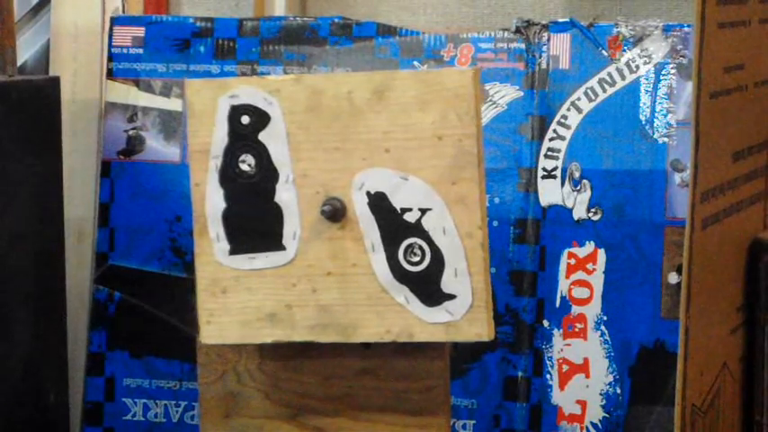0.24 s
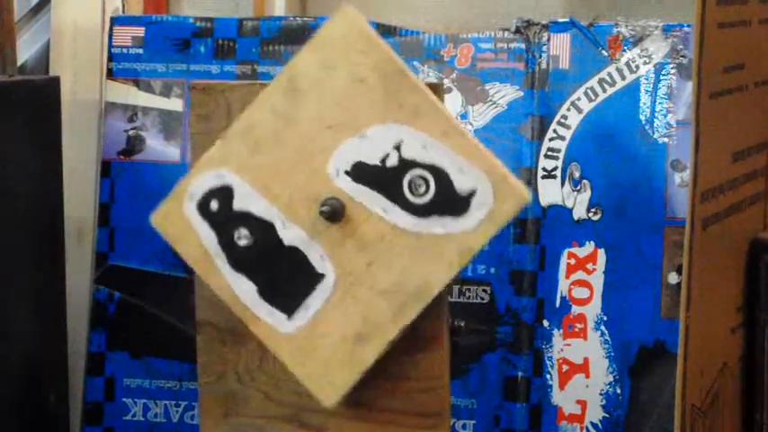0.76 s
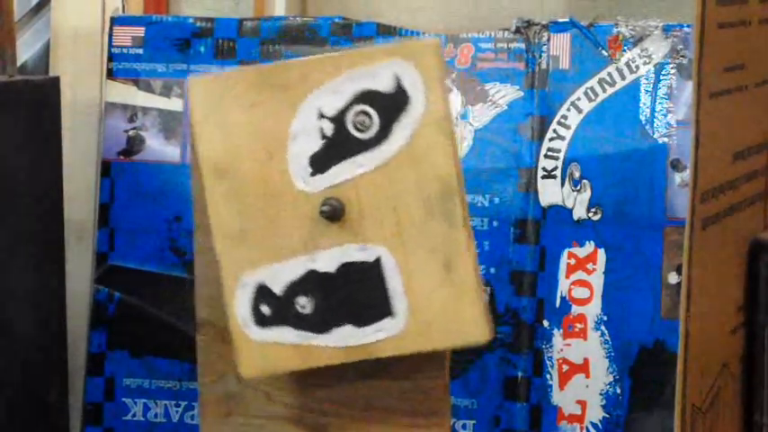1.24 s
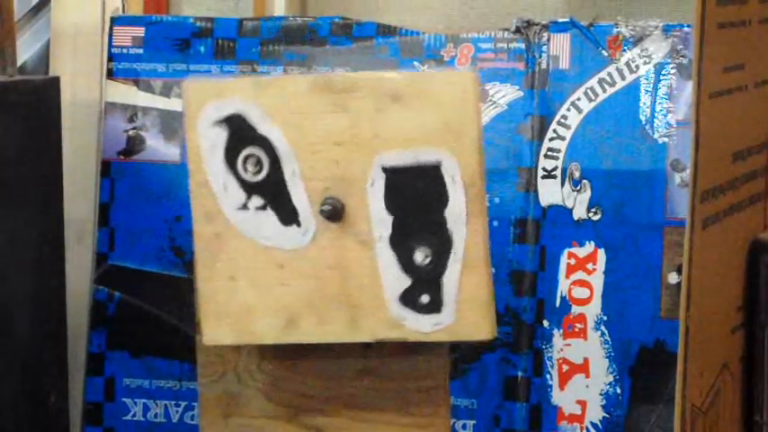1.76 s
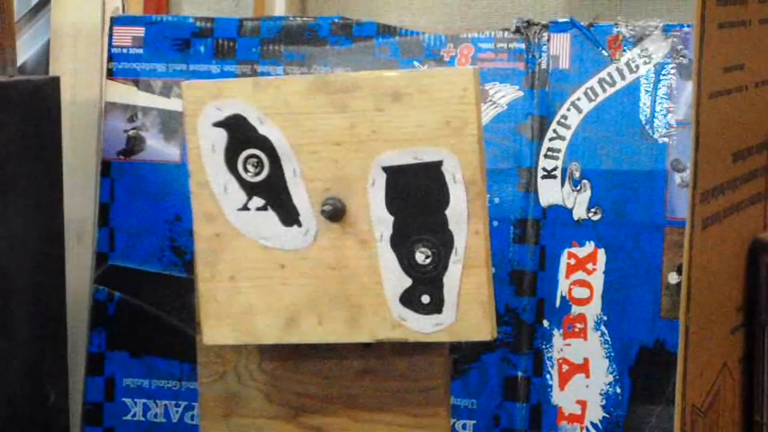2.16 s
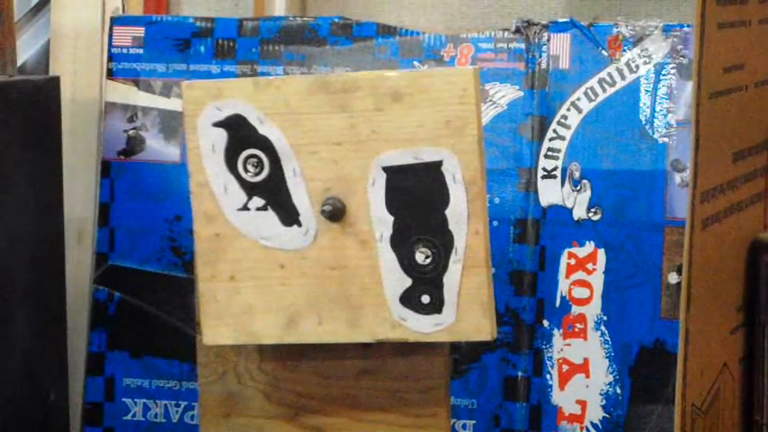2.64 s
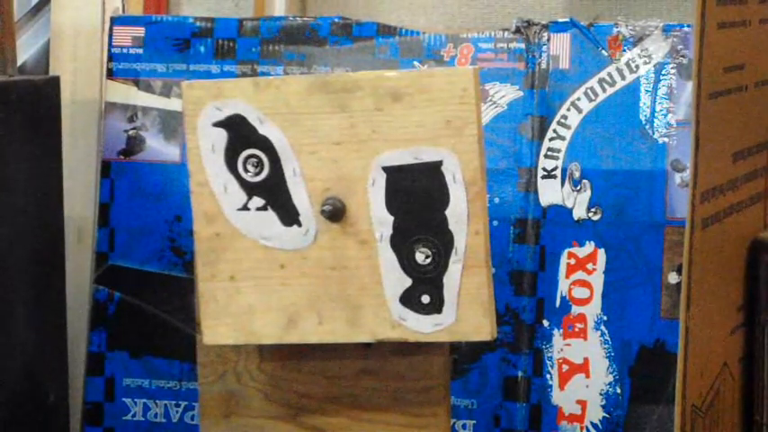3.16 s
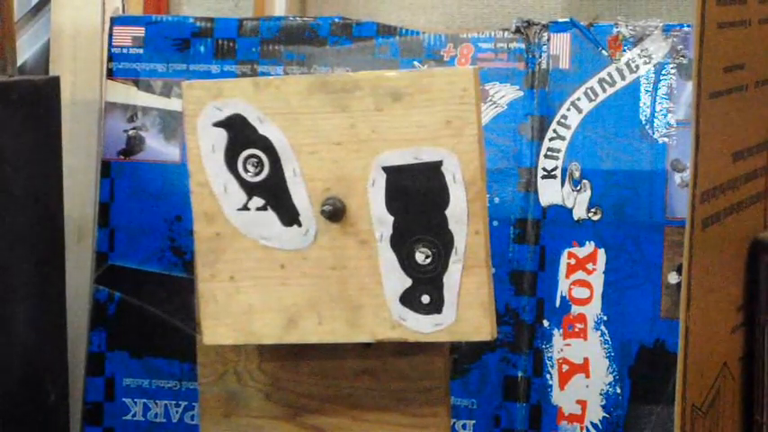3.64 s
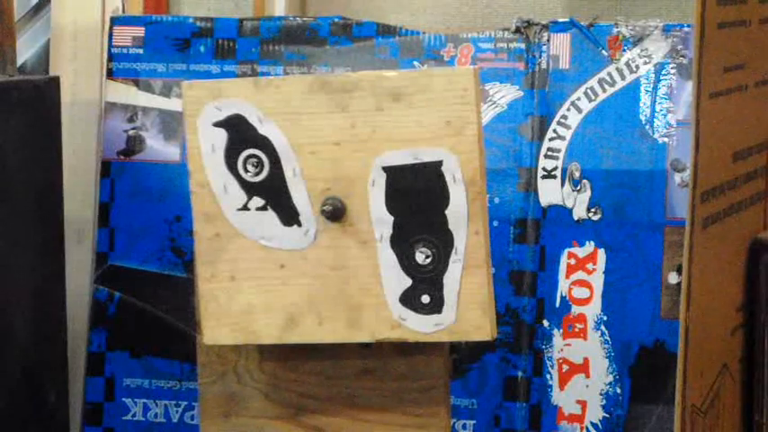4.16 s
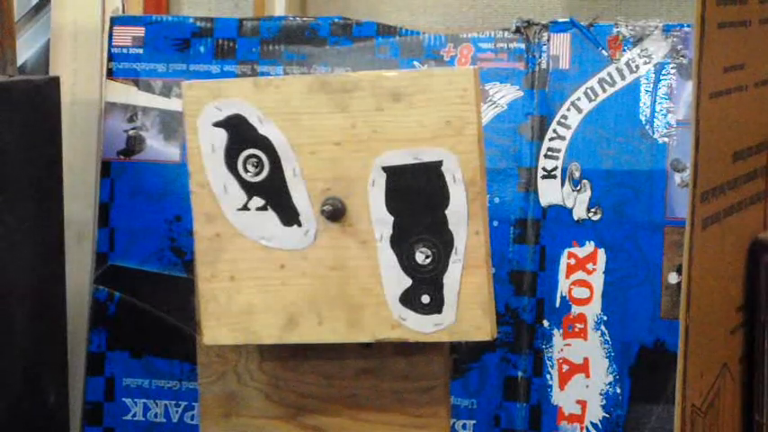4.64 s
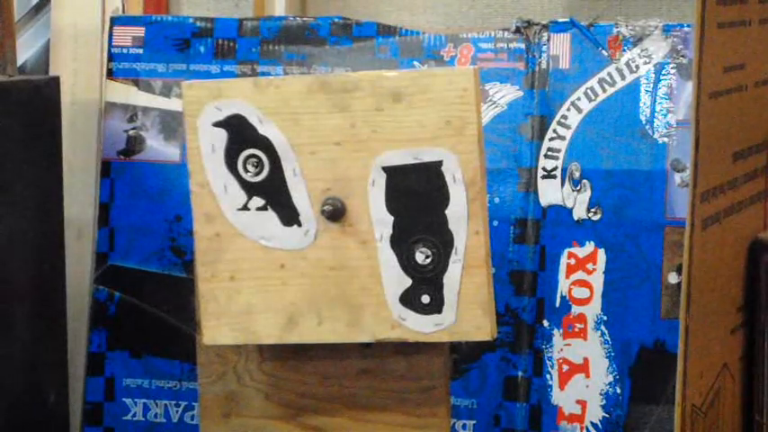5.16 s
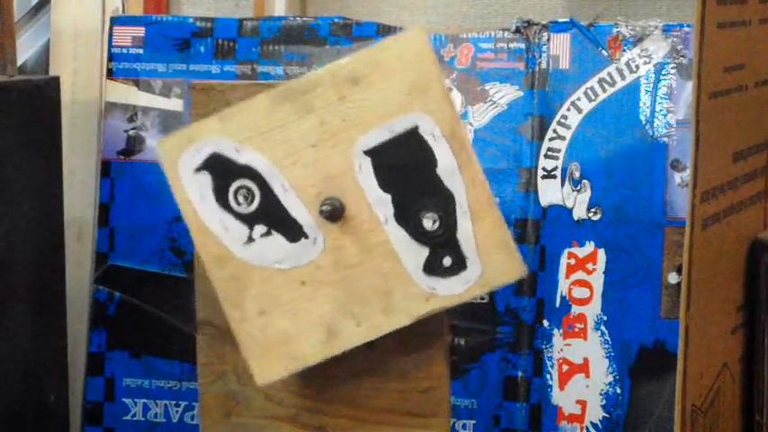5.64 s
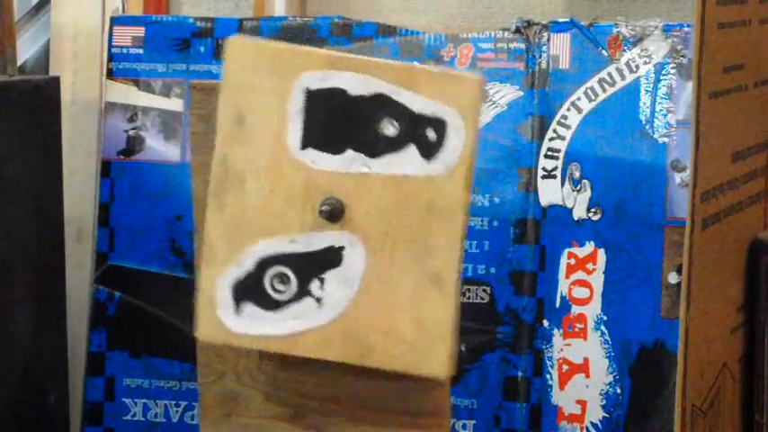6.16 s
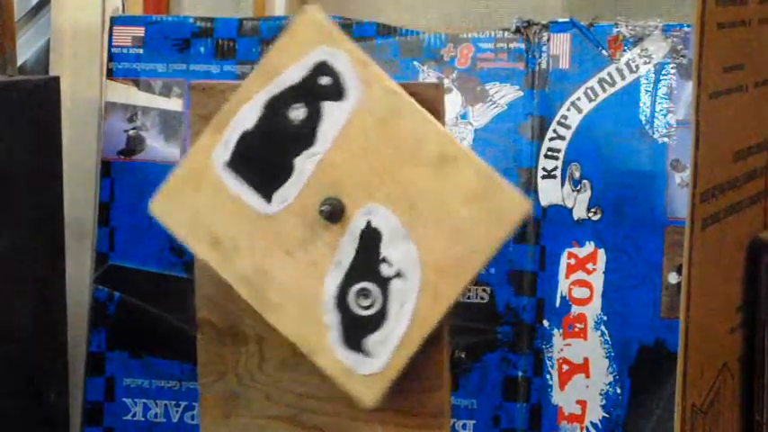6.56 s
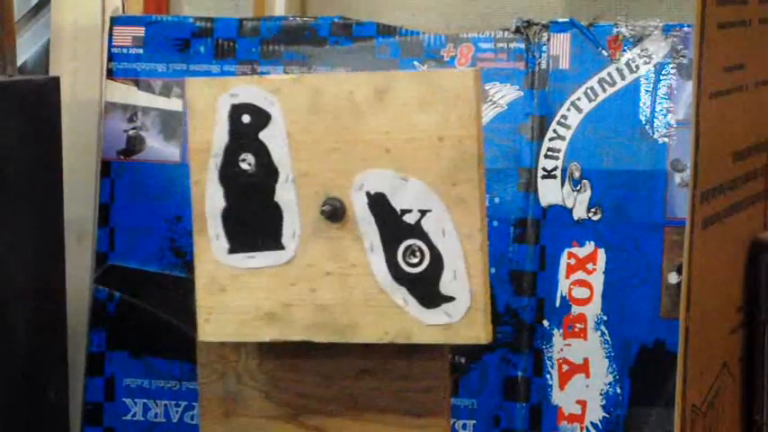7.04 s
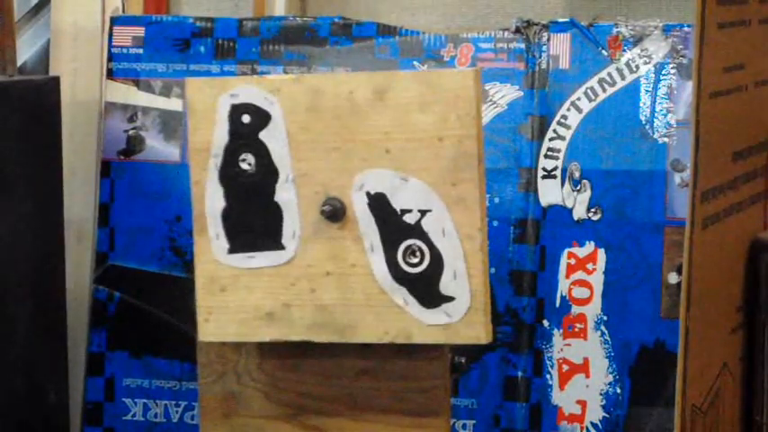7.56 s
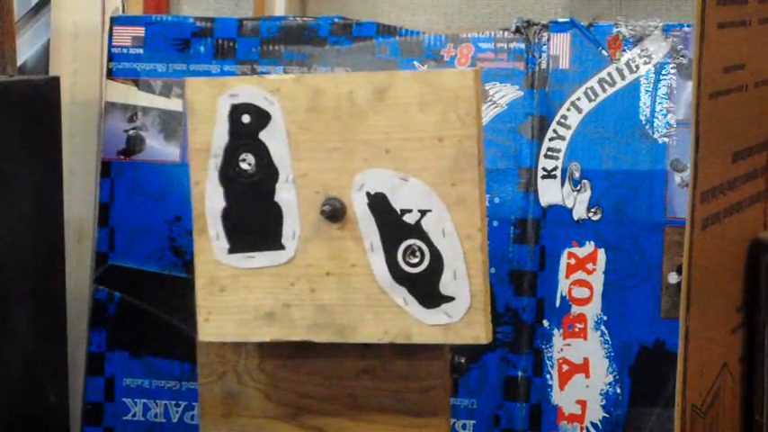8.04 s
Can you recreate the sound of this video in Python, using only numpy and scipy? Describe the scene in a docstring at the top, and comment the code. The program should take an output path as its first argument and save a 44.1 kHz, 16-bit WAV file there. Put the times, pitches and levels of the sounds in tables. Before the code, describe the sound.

Two loud, slightly clipped air gun reports, about five seconds apart, bounce off the walls around a microphone beside a wooden spinner. Each is a rapid triple blow: report, resonant plywood smack, sharp ringing rebound, then a short room tail. Much quieter bolt friction and small rattles swell as the board turns, ending in a firm hollow knock. Gun action clicks come from across the room over soft hiss, low hum and a thin high whine.

```python
"""Air gun and plywood spinner

Two air gun shots in a hard-walled room, heard from beside the target: filtered bursts, wall echoes and a room tail.
Each is followed by the pellet's smack on the board and its rebound, ringing with modal resonances. The board then
turns on its bolt, rubbing and rattling as random slips and small knocks, until it knocks against its stop.
The gun's action clicks after each shot, over shaped hiss, a low hum and a thin whine.
"""
import sys
import numpy as np
from scipy import signal
from scipy.fft import rfft, irfft
from scipy.io import wavfile
from scipy.ndimage import uniform_filter1d

SR = 44100
rng = np.random.default_rng(int(sys.argv[2]) if len(sys.argv) > 2 else 0)


def wrap_up_sound(samples):
    """Save the sound to the file named by the first command line argument, as 16-bit audio."""
    columns = np.atleast_2d(samples).T
    # keep every value between -1 and 1, then stretch to whole-number steps
    tamed = np.clip(columns, -1, 1)
    steps = np.round(tamed * 32767).astype(np.int16)
    wavfile.write(sys.argv[1], SR, steps)


N = 366471
TAPS = 8192  # length of the filters and bursts, in samples
HZ = np.fft.rfftfreq(TAPS, 1 / SR)
TIME = np.arange(N) / SR

# Plywood resonances. Each row: frequency in Hz, width in Hz, lift in dB before each sound's own share.
BOARD_MODES = [(309.9, 8.3, 5), (746, 47, 5), (766, 30, 1), (897, 30, 6), (970, 75, 5.5), (1348, 26, 9),
               (1719, 75, 13.5), (2040, 30, 2.5), (2183, 44, 7), (2385, 23, 8), (2560, 27, 3),
               (3120, 56, 5), (3500, 53, 3), (3630, 26, 5.5), (4030, 22, 8.5)]
# Tone of the clicking metal of the gun. Each row: frequency in Hz, relative level in dB.
CLICK_TONE = [(100, -23.5), (500, -19.5), (950, -7.5), (1450, -11), (2100, -6.5), (2500, -11.5), (3000, -6),
              (4000, -2.5), (6000, -1.5), (9200, -0.5), (11000, -12), (16000, -26)]


def gain_of(db):
    """Decibels to amplitude."""
    return 10 ** (np.asarray(db) / 20)


def evened(x):
    """Scales to rms 1."""
    return x / np.sqrt(np.mean(x ** 2) + 1e-20)


def unit(x):
    """Scales to energy 1."""
    return x / np.sqrt(np.sum(x ** 2) + 1e-20)


def read(points, hz=HZ):
    """Joins (Hz, value) points on a log-frequency axis."""
    f, value = np.transpose(points)
    return np.interp(np.log(hz + 1), np.log(f + 1), value)


def add(mix, s, sound):
    """Mixes a sound in at time s, in seconds."""
    part = mix[max(round(s * SR), 0):][:len(sound)]
    part += sound[:len(part)]


def lifts(modes):
    """The dB that an object's resonances add to its spectrum: a sum of bell-shaped power peaks."""
    power = 1
    for hz, width, db in modes:
        extra = max(gain_of(db) ** 2 - 1, 0)  # resonances only lift, never cut
        power = power + extra / (1 + (2 * (HZ - hz) / width) ** 2)
    return 10 * np.log10(power)


def ring(db):
    """Minimum-phase impulse response with this spectrum, energy 1: sharp onset, then the resonances ring on."""
    both_sides = np.concatenate([db, db[-2:0:-1]])
    log_gain = np.log(gain_of(both_sides))
    return unit(np.fft.ifft(np.exp(np.conj(signal.hilbert(log_gain)))).real)


def burst(fall_s, treble_db=0):
    """A click that frays into quickly dying noise; even in spectrum but for a shelf in the treble."""
    t = np.arange(TAPS) / SR
    # the two fades together make about 80 dB over fall_s
    z = rfft(rng.standard_normal(TAPS) * gain_of(-60 * t / fall_s))
    bins = int(np.clip(8 / fall_s / HZ[1], 3, 600))
    smooth = np.sqrt(uniform_filter1d(abs(z) ** 2, bins) + 1e-12)
    click = unit(irfft(z / smooth) * gain_of(-20 * t / fall_s))
    treble = signal.lfilter(*signal.butter(2, 6000, "high", fs=SR), click)
    return click + (gain_of(treble_db) - 1) * treble


def room(build, lumps_db=3.5, merge=0.045):
    """Tail of energy 1: swells over `build` seconds, then each band dies at its own speed."""
    # Decay of the room. Each row: frequency in Hz, time to fall 60 dB in seconds.
    decay = [(100, .6), (260, 0.61), (700, .55), (1800, 0.42), (3500, .48), (5500, .41), (8000, .36),
             (11000, .29), (15000, 0.17)]
    phases = np.exp(2j * np.pi * rng.random(SR // 2 + 1))
    hz, t, z = signal.stft(irfft(phases), SR, nperseg=256)
    fading = z * gain_of(-60 * t / read(decay, hz)[:, None])
    tail = signal.istft(fading, SR, nperseg=256)[1][:SR]
    age = np.arange(SR) / SR
    # the first reflections come in separate clumps, which merge over `merge` seconds
    lumps = evened(uniform_filter1d(rng.standard_normal(SR), size=70))
    clumping = gain_of(lumps_db * lumps * np.exp(-age / merge))
    return unit(tail * (1 - np.exp(-age / build)) * clumping)


def path(crack_s, scatter_s, scatter_db, room_db, build, echoes=(), edge_db=0):
    """A blow on its way to the microphone: keen direct crack, distinct echoes, scatter off near things, room."""
    out = gain_of(room_db) * room(build)
    add(out, 0, burst(crack_s, edge_db))  # edge_db shelves the treble of the direct crack alone
    add(out, 0, gain_of(scatter_db) * burst(scatter_s))
    for delay, db in echoes:
        add(out, delay, gain_of(db) * burst(crack_s))
    return out


def blows(rows, spectrum_db, way):
    """Each blow rings the object with its own strength, brightness and weight."""
    out = np.zeros(N)
    octaves = np.log2(np.clip(HZ, 250, None) / 2000)  # brightness pivots at 2 kHz
    low = 1 / (1 + (HZ / 450) ** 4)
    level_window = .05  # s; a blow's level is its whole energy spread over this time
    for row in rows:
        s, db, tilt, bass_db = (*row, 0, 0)[:4]
        body = ring(spectrum_db + tilt * octaves + bass_db * low)
        sound = signal.fftconvolve(body, way)
        add(out, s, gain_of(db) * np.sqrt(level_window * SR) * unit(sound))
    return out


def friction(spectrum_db, per_s, spread_db, room_db):
    """Tiny slips of uneven size ring a body and the room; rms 1."""
    size = gain_of(spread_db * np.minimum(rng.exponential(1, N), 4))
    slips = size * rng.choice([-1, 1], N) * (rng.random(N) < per_s / SR)
    near = signal.oaconvolve(slips, ring(spectrum_db))[:N]
    reverb = signal.oaconvolve(near, room(build=0.012))[:N]
    return evened(near + gain_of(room_db) * reverb)


def stroke(s, length, db, attack_s, release_s):
    """Amplitude of one rubbing contact: rises, holds for its length, dies away."""
    age = TIME - s
    rise = np.clip(age / attack_s, 0, 1)
    return gain_of(db) * rise * np.exp(-np.maximum(age - length, 0) / release_s)


def gun():
    """The hammer ticks just before each report, which arrives mostly by way of the walls."""
    # Muzzle reports. Each row: time in seconds, level in dB.
    shots = [(0.4302, -12.5), (5.5416, -12)]
    # Tone of the report. Each row: frequency in Hz, relative level in dB.
    report_tone = [(40, -15.5), (100, -17), (130, -7.5), (220, -2.5), (480, -2.5), (750, 2), (1400, -4),
                   (2200, -0.5), (3300, 3.5), (5000, 0), (8000, 5.5), (10300, 3), (11700, -3.5),
                   (13300, -8), (16000, -17.5)]
    # Walls and ceiling throw the report at the target. Each row: delay in seconds, dB against the direct crack.
    walls = [(.0048, 4.5), (.0141, 8.5), (.0195, 3), (.0235, 7), (.029, 0.5)]
    way = path(crack_s=0.011, scatter_s=0.091, scatter_db=3.0, room_db=13.5, build=0.014,
               echoes=walls, edge_db=-4)
    hammer_lead, hammer_db = .004, -30  # s ahead of the report, dB against it
    ticks = [(s - hammer_lead, db + hammer_db, 1.5) for s, db in shots]
    hammer = blows(ticks, read(CLICK_TONE), way)
    return hammer + blows(shots, read(report_tone), way)


def pellet_smacks():
    """The pellet smacks the plywood and excites its resonances."""
    # Hits on the board. Each row: time in seconds, level in dB, brightness in dB per octave.
    smacks = [(.4697, -10, 2), (5.5812, -11.5, 4)]
    # Tone of the smack. Each row: frequency in Hz, relative level in dB.
    smack_tone = [(40, -20), (100, -20), (130, -9.5), (260, -8.5), (500, -3), (1000, 6.5), (1600, 3.5),
                  (3000, 5.5), (5000, 0.5), (8000, 1.5), (10300, -3), (11700, -8.5), (13300, -14.5),
                  (16000, -23)]
    way = path(crack_s=0.015, scatter_s=0.15, scatter_db=8, room_db=6.5, build=.008,
               echoes=[(.0043, 0.0035)], edge_db=2.5)
    return blows(smacks, read(smack_tone) + 0.53 * lifts(BOARD_MODES), way)


def pellet_rebounds():
    """The rebounding pellet cracks against the backstop and sets it ringing."""
    # Hits on the backstop. Each row: time in seconds, level in dB, brightness in dB per octave.
    rebounds = [(.5145, -11, 0.5), (5.6328, -14.5, -1)]
    # Tone of the rebound. Each row: frequency in Hz, relative level in dB.
    rebound_tone = [(40, -19), (100, -22), (130, -14), (300, -13.5), (520, -9), (650, -2), (950, 0),
                    (1350, -6.5), (2300, 4.5), (3500, 4), (5200, 2.5), (6300, 2.5), (8000, 0.5),
                    (11000, -15.5), (16000, -28)]
    # What the pellet sets ringing. Each row: frequency in Hz, width in Hz, lift in dB.
    backstop = [(695, 11, 12.5), (954.5, 32, 7.5), (1710, 34, 5), (2260, 33, 10.5), (2790, 13, 5.5),
                (3156, 25, 6), (3760, 37, 6.5), (4080, 20, 7.5), (4840, 40, 8)]
    way = path(crack_s=0.002, scatter_s=0.11, scatter_db=-0.5, room_db=1.0, build=.006,
               echoes=[(.0065, -9), (.009, -5)], edge_db=11.5)
    return blows(rebounds, read(rebound_tone) + lifts(backstop), way)


def stop_knocks():
    """The board knocks against its stop: a bright, woody blow with added bass."""
    # Hits on the stop. Each row: time in seconds, level in dB, brightness in dB per octave, bass lift in dB.
    knocks = [(2.0531, -21.5, 3, 11.5), (7.0814, -21, 1.9, 12.5)]
    # Tone of the knock. Each row: frequency in Hz, relative level in dB.
    knock_tone = [(40, -42.5), (95, -46), (128, -2), (185, -7.5), (260, -4), (430, -1), (620, 6.5),
                  (1100, 8), (1550, -2.5), (2500, 4.5), (3500, -4.5), (4800, -9.5), (7500, -13),
                  (10500, -20), (15500, -39.5)]
    way = path(crack_s=0.047, scatter_s=0.27, scatter_db=6.5, room_db=6.5, build=0.0011,
               echoes=[(.0072, 1)], edge_db=10)
    return blows(knocks, read(knock_tone) + 0.94 * lifts(BOARD_MODES), way)


def swing(start, fastest, stop, fade_s=0.038):
    """Friction on the bolt through one turn: it grows with speed, then holds through the upswing."""
    t = TIME - fastest
    gather_db = 17.5 * np.minimum(t, 0)  # dB per second up to the fastest moment
    # at the bottom the weight briefly bears harder on the bolt; just past it the load lifts for a moment
    press_db = 7 * np.exp(-(t / 0.028) ** 2)
    ease_db = -2.5 * np.exp(-((t - 0.086) / 0.028) ** 2)
    return stroke(start, stop - start, gather_db + press_db + ease_db, fade_s, fade_s)


def chatter(start, stop, strength):
    """Small rattles at uneven intervals that follow the friction of the moment: rows (s, dB)."""
    per_s, offset_db, spread_db = 18, -1.5, 9.5  # offset and random spread are against the friction
    chance = rng.random((100, 2))
    times = start + (np.arange(len(chance)) + chance[:, 0]) / per_s
    friction_db = 20 * np.log10(np.interp(times, TIME, strength) + 1e-9)
    db = friction_db + offset_db + spread_db * (2 * chance[:, 1] - 1)
    return np.column_stack([times, db])[times < stop]


def turning_board():
    """The pellet drops; the board gathers speed and grinds round on its bolt, rubbing, rasping and rattling."""
    # Turns until the heavy side swings through the bottom and up. Each row: start, fastest moment and stop
    # in seconds, rubbing and dry rasp in dB before the swing's changing load.
    turns = [(0.85, 1.785, 2.04, -47.5, -62), (5.999, 6.793, 7.07, -48.5, -60)]
    # Tone of the rubbing. Each row: frequency in Hz, relative level in dB.
    rub_tone = [(100, -28), (180, -6), (400, -13.5), (560, -8.5), (740, -4), (860, -5), (1040, -8.5),
                (1300, -5), (2000, -16), (4000, -38)]
    # Tone of the dry rasp. Each row: frequency in Hz, relative level in dB.
    rasp_tone = [(600, -54), (1300, -34), (1800, 1), (2700, 0.5), (3600, -9.5), (4300, -9.5), (6500, -14.5),
                 (10000, -17), (15000, -42)]
    # Loudest short knocks and rattles: the dropping pellet, then the board in the play of its bolt.
    # Each row: time in seconds, level in dB, brightness in dB per octave.
    short_knocks = [(.648, -28.5, 1.5), (1.524, -53, -7), (1.732, -52, -4), (1.777, -47.5, -1),
                    (5.869, -35, 1), (5.982, -46, 0.5), (6.187, -57.5, 0.5), (6.383, -54, -2),
                    (6.664, -46, -3.5), (6.694, -50.5, -0.5), (6.732, -42.5, -3), (6.773, -44.5, -0.5),
                    (6.82, -54, 2.5), (6.934, -48, 0), (6.969, -47, -0.5)]
    # Tone of these knocks and rattles. Each row: frequency in Hz, relative level in dB.
    rattle_tone = [(80, -25), (170, -22), (450, -10), (720, 0), (1000, 0), (1330, -2), (1750, 5), (2500, 4),
                   (3550, 0.5), (4200, -10), (6500, -18), (10000, -26), (15000, -36)]
    # Resonances that the bolt drives at the board's centre. Each row: frequency in Hz, width in Hz,
    # lift in dB before each sound's own share (a negative lift has no effect).
    hub_modes = [(356, 15, 10), (581, 14, 10), (764, 14, 19.5), (747, 103, 7), (909, 48, 9),
                 (1035, 37, 18.5), (1134, 19, -5)]
    wood, hub = lifts(BOARD_MODES), lifts(hub_modes)
    loose = path(crack_s=0.0066, scatter_s=0.095, scatter_db=14.0, room_db=17, build=0.0015, edge_db=-9)
    rubbing, rasping, small_rattles = np.zeros(N), np.zeros(N), []
    for start, fastest, stop, rub_db, rasp_db in turns:
        effort = swing(start, fastest, stop)
        rubbing += gain_of(rub_db) * effort
        rasping += gain_of(rasp_db) * effort
        small_rattles += list(chatter(start, stop, rasping))
    rattle_spectrum = read(rattle_tone) + 0.24 * wood + 0.45 * hub
    rattles = blows(list(short_knocks) + small_rattles, rattle_spectrum, loose)
    rub = friction(read(rub_tone) + hub, per_s=260, spread_db=-2, room_db=-8.5) * rubbing
    rasp = friction(read(rasp_tone) + 0.59 * wood, per_s=170, spread_db=1.0, room_db=13) * rasping
    return rattles + rub + rasp


def stand_grazes():
    """The fast-turning board grazes its stand in short scraping contacts."""
    # Contacts. Each row: time in seconds, length in seconds, level in dB.
    grazes = [(1.78, .03, -62), (6.598, 0.28, -57.5), (6.78, 0.044, -44), (6.968, 0.049, -52.5),
              (7.014, 0.05, -45)]
    # Tone of the graze. Each row: frequency in Hz, relative level in dB.
    graze_tone = [(80, -12), (170, -5), (400, -3), (900, 3), (1800, 0.5), (3400, 4.5), (4400, -7),
                  (6500, -7.5), (9000, -10), (11500, -19), (15000, -23)]
    grazing = sum(stroke(*row, attack_s=.008, release_s=0.029) for row in grazes)
    return friction(read(graze_tone), per_s=110, spread_db=1.5, room_db=3) * grazing


def bolt_squeak():
    """The bolt catches briefly: rapid slips that squeak."""
    # The catch, a single row: time in seconds, length in seconds, level in dB.
    catch = (1.632, 0.013, -50.5)
    # Tone of the squeak. Each row: frequency in Hz, relative level in dB.
    squeak_tone = [(1500, -18), (2500, -7), (2850, -6), (3250, -19), (3680, -5), (4000, -18), (4600, -28),
                   (9000, -42)]
    slips = friction(read(squeak_tone), per_s=980, spread_db=1.0, room_db=0)
    return slips * stroke(*catch, attack_s=.006, release_s=0.036)


def sinking_thuds():
    """The board sinks back with a dull double thud that rings its stand."""
    # Thuds. Each row: time in seconds, level in dB.
    thuds = [(2.3005, -49.5), (2.313, -46)]
    # Tone of the thud. Each row: frequency in Hz, relative level in dB.
    thud_tone = [(70, -16), (130, -2), (230, -5.5), (330, -3), (600, -7), (820, -7.5), (1150, -15),
                 (2000, -15), (4000, -28), (10000, -45)]
    # Resonances of the stand. Each row: frequency in Hz, width in Hz, lift in dB.
    stand = [(333, 33, 12), (460, 27, 7), (773, 56, 11), (1340, 50, 11)]
    way = path(crack_s=0.018, scatter_s=0.093, scatter_db=3, room_db=-1.5, build=0.01)
    return blows(thuds, read(thud_tone) + lifts(stand), way)


def action():
    """Across the room the steel action clicks, and scrapes once as the gun is handled."""
    # Clicks. Each row: time in seconds, level in dB, brightness in dB per octave.
    latches = [(2.3725, -51.5, 3.5), (2.3918, -38.5, 0.5), (2.425, -55.5, -7.5), (7.4662, -48.5, 4),
               (7.476, -52, 11), (7.4862, -38, 1.5), (7.499, -47.5, -3.5), (7.837, -55.5, -2.5)]
    # Resonances of the steel. Each row: frequency in Hz, width in Hz, lift in dB.
    steel = [(2080, 270, 8), (2770, 100, 15), (2870, 110, 12), (3720, 225, 10.5), (3900, 170, 7),
             (4860, 130, 5), (7100, 150, 2), (9300, 330, 2)]
    # The short scrape, a single row: time in seconds, length in seconds, level in dB.
    slide = (7.815, 0.11, -52)
    # Tone of the scrape. Each row: frequency in Hz, relative level in dB.
    scrape_tone = [(200, -12), (550, -15), (690, -3), (1000, -5.5), (1450, -18), (2000, -1.5), (3400, -1),
                   (4200, -13), (7000, -16), (10000, -29), (15000, -33)]
    way = path(crack_s=0.027, scatter_s=0.19, scatter_db=0, room_db=5.5, build=0.012, edge_db=-24)
    scrape = friction(read(scrape_tone), per_s=500, spread_db=0.0, room_db=3)
    scrape = scrape * stroke(*slide, attack_s=0.035, release_s=0.032)
    return blows(latches, read(CLICK_TONE) + lifts(steel), way) + scrape


def background():
    """Even hiss, with the camera's steady hum tones and a thin electronic whine that keeps flipping its phase."""
    # Colour of the hiss. Each row: frequency in Hz, relative density in dB per Hz.
    hiss_tone = [(10, -5.5), (25, 1.5), (70, -1.5), (110, -3.5), (200, -7), (630, -10.5), (2100, -15),
                 (7000, -19), (16000, -21.5)]
    # The camera's hum and its highest whistle. Each row: frequency in Hz, rms level in dB.
    hum_tones = [(29.8, -66), (59.7, -75.5), (89.5, -79.5), (15795, -85)]
    hiss_db, whine_db = -62, -69  # rms levels
    whine_hz, flips_per_s = 7867.5, 59.68  # one flip at every frame of the camera
    hz = np.fft.rfftfreq(N, 1 / SR)
    hiss = evened(irfft(rfft(rng.standard_normal(N)) * gain_of(read(hiss_tone, hz)), N))
    hum = np.zeros(N)
    for f, db in hum_tones:
        hum += gain_of(db) * np.sqrt(2) * np.sin(2 * np.pi * (f * TIME + rng.random()))
    flip = np.tanh(12 * np.sin(np.pi * flips_per_s * TIME))
    whine = evened(flip * np.sin(2 * np.pi * whine_hz * TIME))
    return gain_of(hiss_db) * hiss + hum + gain_of(whine_db) * whine


def scene():
    """All sources at one microphone."""
    shots = gun() + pellet_smacks() + pellet_rebounds()
    spinner = stop_knocks() + turning_board() + stand_grazes() + bolt_squeak() + sinking_thuds()
    return (shots + spinner + action() + background())[None]


def record(dry, ceiling=.9):
    """The loudest cracks are clipped flat at a ceiling; then a steep low-pass limits the band."""
    clipped = np.clip(dry, -ceiling, ceiling)
    edge_hz = 16150
    low_pass = signal.firwin(511, edge_hz, window=("kaiser", 9), fs=SR)
    return signal.oaconvolve(clipped, low_pass[None], "same")


dry = scene()
out = record(dry)
wrap_up_sound(out)
```